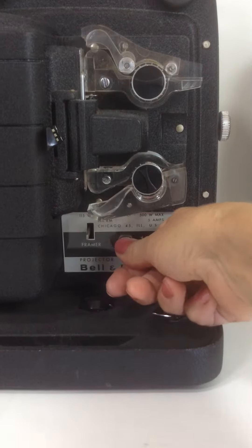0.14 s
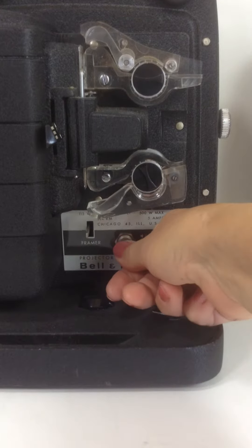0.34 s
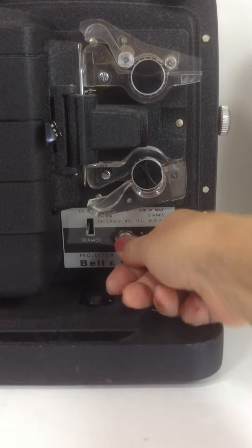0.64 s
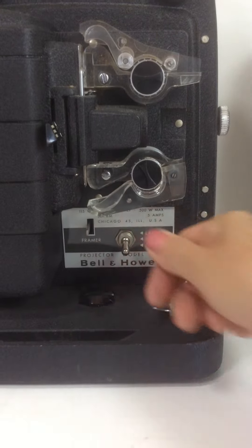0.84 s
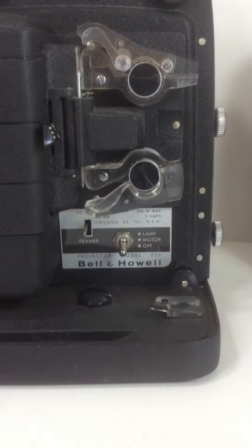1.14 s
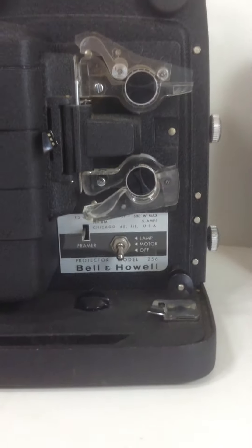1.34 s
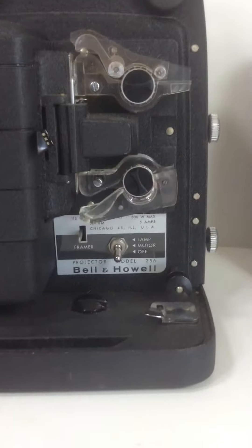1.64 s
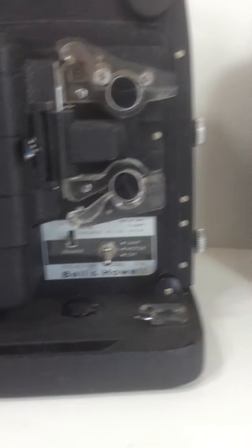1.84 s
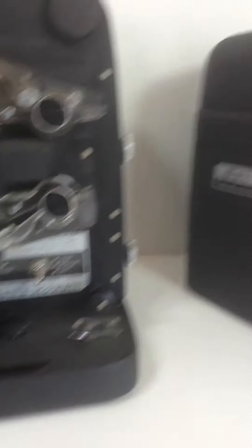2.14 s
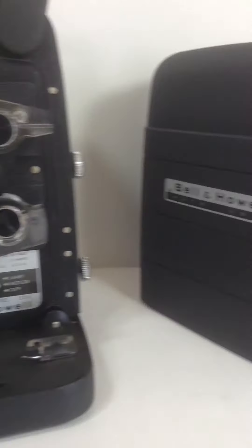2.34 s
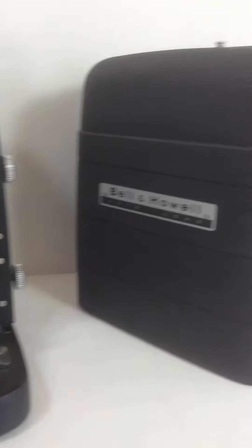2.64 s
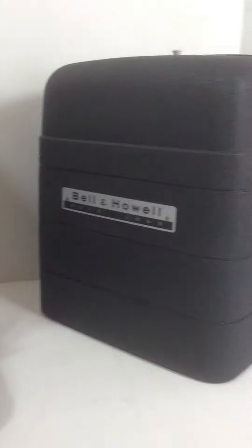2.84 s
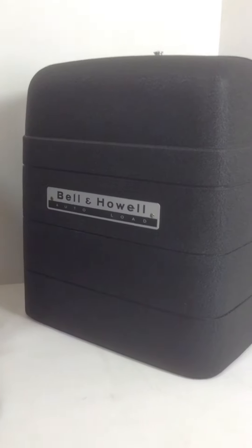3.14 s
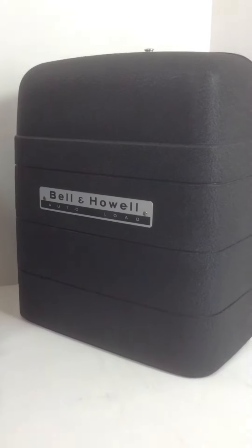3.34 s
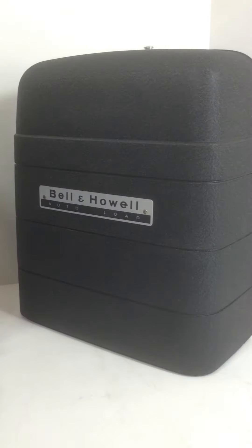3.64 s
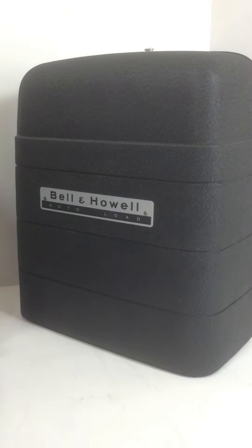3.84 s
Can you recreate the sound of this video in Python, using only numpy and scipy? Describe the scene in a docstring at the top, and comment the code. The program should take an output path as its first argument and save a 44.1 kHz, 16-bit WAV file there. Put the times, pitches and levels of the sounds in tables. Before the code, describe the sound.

Close up in a quiet room, a running projector is switched off with a hard metallic click; its rattling whirr sinks and fades within about a second, followed by soft hiss and sparse camera bumps.

```python
"""Film projector switched off

A film projector's motor hums on a table, made of wavering sine tones, bearing hiss and rattling noise.
A toggle switch snaps off as a train of noise bursts, with a ringing panel and a room tail. The motor
coasts to rest with a fan tone, a whirr and faint squeaks of filtered noise. A loose part chatters, the
hand-held camera is bumped and a tap sweeps down the table, over the shaped noise of a quiet room."""
import sys
import numpy as np
from scipy import signal
from scipy.fft import rfft, irfft
from scipy.io import wavfile
from scipy.ndimage import uniform_filter1d

SR = 44100
rng = np.random.default_rng(int(sys.argv[2]) if len(sys.argv) > 2 else 0)


def dump_mix(stems):
    """Bounce the given channels to the path in sys.argv[1] as a 16-bit WAV at rate SR."""
    frames = np.atleast_2d(stems).T  # one column per channel
    limited = np.clip(frames, -1, 1)  # hard clip at full scale
    pcm = np.round(limited * 32767).astype(np.int16)
    wavfile.write(sys.argv[1], SR, pcm)


def invert_db(x):
    """Field ratio 10**(x/20) for x, a level in decibels (scalar or array-like)."""
    u = np.asarray(x, float) / 20
    return 10 ** u


N = 176400
T = np.arange(N) / SR  # time in seconds

# The room's background noise. Each row: frequency in Hz, level in dB per Hz.
AIR_COLOUR = [(15, -62.5), (25, -31.5), (87, -31.5), (117, -5), (157, -8.5), (185, -2.5), (263, -1.5),
              (373, -5), (451, -4.5), (489, -9.5), (911, -7.5), (2000, -17), (14400, -24.5), (16000, -35)]
AIR_DB = -63.5
BASS_CUT_HZ = 130  # the microphone's roll-off

OFF_S = .2106  # when the power is cut
SHAFT_HZ, COAST_HZ_PER_S = 57.3, 39  # the shaft slows evenly once the power is cut

# Magnetic hum that stops with the current. Each row: multiple of shaft speed, level in dB, flutter in dB.
HUM_TONES = [(4, -54.5, 5), (5, -49, 4), (6, -51, 4.5), (7, -52.5, 4), (8.03, -47.5, 3), (14, -53, 3),
             (15.1, -37.5, 0.5), (16, -46, 2), (27, -52.5, 2), (30.6, -53.5, 2), (35.45, -51.5, 2),
             (59.5, -57.5, 2), (75.5, -57.5, 2.5)]
HUM_T60_S, HUM_WAVER_DB, HUM_JITTER_HZ = 0.069, 1.8, 3

# Hiss of the turning bearing. Each row: centre in Hz, width in Hz, level in dB at full speed.
BEARING_BANDS = [(7500, 2000, -69), (10700, 3100, -66.5)]
BEARING_FLUTTER_DB, BEARING_SPEED_POWER = 3, 0.93

# How hard the running gear shakes the casing. Each row: time in seconds, level in dB.
RATTLE_LEVEL = [(0.0, -39.5), (0.19, -39), (0.48, -47), (0.614, -50), (0.894, -59.5), (1.282, -71),
                (1.6, -70.5)]
# Tone colour of the rattle's broad noise. Each row: frequency in Hz, level in dB per Hz.
RATTLE_COLOUR = [(53, -71.5), (90, -37), (282, -1), (381, -8), (463, -12), (599, -17.5), (883, -6),
                 (963, -7.5), (2050, -19), (2650, -25), (4260, -23.5), (5750, -43.5), (15500, -48.5)]
# Casing resonances. Each row: centre in Hz, width in Hz, level in dB before a shared cut.
CASING_MODES = [(280, 38, -0.5), (356.3, 30, -3), (462, 33, -1.5), (900, 24, -7.5), (1140, 97, -10.5),
                (1390, 60, -11.5), (1670, 50, -13.5), (1780, 53, -12), (2020, 63, -8), (2320, 35, -17),
                (3270, 120, -15.5), (3450, 58, -18), (4162, 99, -17), (4400, 63, -13.5)]
RATTLE_THROB, RATTLE_GRIT_DB = 0.16, -0.5  # pulse share each turn; uneven grit
DULLING_DB = 6  # dB per octave lost per second of coasting

# Contacts of the toggle. Each row: start in seconds, rough peak in dB before colouring.
SNAPS = [(.2086, -26.5), (0.2114, -19.5), (0.21, -7), (0.2106, -2), (0.2095, -5), (0.2125, -7.5),
         (0.2128, -8.5), (0.2146, -8.5), (0.2168, -12), (0.2193, -13.5), (0.2213, -7.5)]
# Tone colour of the snaps. Each row: frequency in Hz, level in dB per Hz.
SNAP_COLOUR = [(35, -51), (60, -24.5), (651, -12), (842, -6), (1140, -11), (1620, -2), (2300, -3.5),
               (4530, -3.5), (6140, -5.5), (9570, -0.5), (14900, -13.5), (16000, -31)]
SNAP_T60_S = .008
# Ringing modes of the front panel. Each row: pitch in Hz, starting level in dB, 60 dB decay in seconds.
PANEL_MODES = [(929, -35.5, 0.33), (1244, -36, 0.34), (1530, -25.5, .15), (1700, -14.5, 0.013),
               (1755, -24, .07), (2860, -34.5, 0.25), (3312, -26, 0.11), (3901, -27.5, 0.08),
               (4320, -30.5, .12), (9533, -34, 0.24), (11000, -23.5, .08)]
PANEL_WAVER_DB = 5
JOLT_DB, JOLT_S = -33, .0005  # peak of the air push; its spread (standard deviation)
# How long the room rings. Each row: frequency in Hz, 60 dB decay in seconds.
ROOM_T60 = [(200, 0.97), (1000, 0.35), (2500, 0.31), (5000, 0.27), (9000, .3), (15000, .25)]
# Tone colour of the room tail. Each row: frequency in Hz, level in dB.
ROOM_COLOUR = [(200, -5.5), (620, -8.5), (1000, -2), (2000, 2.5), (4000, 3.5), (6000, 4), (9000, 1),
               (12000, 3.5), (15000, 3.5)]
ROOM_DB = 11

# The fan blades' tone while coasting. Each row: time in seconds, pitch in Hz, level in dB.
FAN_PATH = [(0.278, 400.4, -59), (0.332, 371.1, -41), (0.399, 337.4, -53), (0.448, 317.7, -54),
            (0.561, 291.9, -44), (0.631, 275.3, -51), (.68, 273, -69), (.8, 288.7, -65),
            (0.928, 290.3, -64), (0.999, 284.5, -78)]
FAN_FLUTTER_DB, FAN_JITTER_HZ = 2.9, 9

# Rough whirr of the slack drive train. Each row: centre in Hz, width in Hz, level in dB before the swell.
WHIRR_BANDS = [(2050, 57, -58), (2870, 60, -63), (3077, 69, -52.5), (4400, 150, -66), (7583, 300, -65.5)]
WHIRR_RISE_S, WHIRR_END_S, WHIRR_FADE_S = .12, .62, .55  # rise and end count from the power cut

# Squeaks while coasting: from the bearing, and near 10 kHz, about every 0.2 s, from a pulley. Each row: middle
# in seconds, level in dB, pitch in Hz, length at half height in seconds.
SQUEAKS = [(0.453, -59, 7500, 0.013), (0.515, -64, 10800, .03), (0.548, -59.5, 7300, 0.017),
           (0.568, -65, 8200, 0.014), (.59, -71, 9900, 0.023), (0.633, -61.5, 7710, 0.017),
           (0.667, -59.5, 7300, 0.016), (0.719, -66, 10700, 0.034), (.765, -62.5, 7170, 0.018),
           (0.802, -63, 7460, 0.024), (0.847, -65.5, 7700, 0.014), (0.886, -68.5, 10750, 0.047),
           (0.932, -65, 7094, 0.018), (0.983, -63, 7120, 0.019), (1.072, -66.5, 10550, 0.044),
           (1.265, -62.5, 7500, 0.011), (1.33, -70.5, 10600, 0.05), (1.374, -67, 12510, .012),
           (1.482, -68, 10200, 0.035)]
SQUEAK_WIDTH_HZ = 2000

# A loose part striking. Each row: start in seconds, level in dB, brightness in dB per octave.
CHATTER_STRIKES = [(0.6902, -48, 6), (0.6927, -39, 6), (0.6947, -44, 1), (0.6976, -43, 5), (.7005, -47, -1),
                   (0.704, -43, -2), (0.709, -44, 2), (0.7195, -45, 4), (.7245, -48, 3), (0.727, -49, 2)]
# Ringing modes of the loose part. Each row: pitch in Hz, level in dB, 60 dB decay in seconds.
CHATTER_MODES = [(1060, -6, .02), (1550, 0, .045), (1890, -5, .015), (2540, 0, .022), (3310, -8, .014),
                 (3750, -7, .012), (4470, -11, .01)]
CHATTER_SPREAD_DB, CHATTER_GRIT_DB = 3, -3  # each strike lands elsewhere and scrapes a little

# Fingers brushing off the switch and the camera. Each row: middle in seconds, level in dB, pitch in Hz,
# length at half height in seconds, width in Hz.
BRUSHES = [(.870, -62, 3540, 0.0082, 1200), (.88, -60, 1203, .015, 910), (2.03, -70.5, 3000, 0.043, 1505),
           (3.223, -64, 2500, 0.013, 3490), (3.599, -65.5, 3807, 0.0083, 701)]

# Knocks on the camera body. Each row: start in seconds, thump peak in dB, tick peak in dB, tick pitch
# in Hz, brightness of the thump in dB per octave.
KNOCKS = [(1.1344, -41.5, -39.5, 4500, 5), (1.1358, -41, -43.5, 1700, 1), (1.1388, -38.5, -40.5, 3970, -2),
          (1.1610, -42.5, -41, 6250, -0.5), (1.1995, -60, -58, 2000, 0), (1.2012, -48.5, -54, 1500, -1.5),
          (1.282, -49, -55, 3000, -2.5), (1.372, -53, -55, 9000, 1), (1.7158, -52.5, -40.5, 2340, 3.5),
          (1.982, -60, -52, 2830, -7), (3.6, -50, -52, 9020, -3)]
# Ringing modes of the camera shell. Each row: pitch in Hz, level in dB, 60 dB decay in seconds.
SHELL_MODES = [(328, -1, .028), (651, 0, .022), (1000, -8, .012), (1303, -6, .018), (1750, -5, .02),
               (2735, -14, .015)]
TICK_T60_S, TICK_WIDTH_SHARE = 0.0103, 0.61  # the tick's width is a share of its pitch

TAP_S, TAP_DB = 1.7176, -38.5
TAP_LOW_HZ, TAP_EXTRA_HZ = 210, 1540  # the pitch starts at their sum and falls towards the low one
TAP_SWEEP_S, TAP_PEAK_S = .0014, .0027


def evened(x):
    """Scales a sound to rms 1."""
    return x / np.sqrt(np.mean(x ** 2) + 1e-20)


def read(points, hz):
    """Reads a frequency table on a log axis."""
    f, value = np.transpose(points)
    return np.interp(np.log(hz + 1), np.log(f + 1), value)


def add(mix, s, sound):
    """Mixes a sound in at s seconds."""
    part = mix[max(round(s * SR), 0):][:len(sound)]
    part += sound[:len(part)]


def coloured(x, points):
    """Shapes a sound's spectrum by a table of levels."""
    gain = invert_db(read(points, np.fft.rfftfreq(len(x), 1 / SR)))
    return irfft(rfft(x) * gain, len(x))


def resonate(x, hz, width_hz):
    """One resonance, with gain 1 at its peak."""
    b, a = signal.iirpeak(min(hz, SR * .45), max(hz / width_hz, .3), SR)
    return signal.lfilter(b, a, x)


def drift(per_s):
    """A slow random wander of rms 1: noise smoothed twice, so a higher per_s moves faster."""
    width = int(SR / per_s)
    smooth = uniform_filter1d(rng.standard_normal(N), width)
    return evened(uniform_filter1d(smooth, width))


def bass_cut(x):
    """The microphone's steep low roll-off."""
    return signal.sosfilt(signal.butter(4, BASS_CUT_HZ, "high", fs=SR, output="sos"), x)


def since_off():
    """Seconds since the power was cut, zero before."""
    return np.maximum(T - OFF_S, 0)


def shaft():
    """Speed of the shaft in turns per second, and the turns made so far."""
    speed = np.maximum(SHAFT_HZ - COAST_HZ_PER_S * since_off(), 0)
    return speed, np.cumsum(speed) / SR


def room_tone():
    """Distant hum and microphone hiss as shaped noise, swelling a little in the bass."""
    hiss = evened(coloured(rng.standard_normal(N), AIR_COLOUR))
    low = signal.sosfilt(signal.butter(2, 600, fs=SR, output="sos"), hiss)
    swell = invert_db(1.2 * drift(4.5)) - 1
    return invert_db(AIR_DB) * (hiss + low * swell)


def magnetic_hum(turns):
    """Tones at multiples of the shaft speed, dying quickly once the current stops."""
    hum = np.zeros(N)
    for multiple, db, flutter_db in HUM_TONES:
        level = invert_db(db + HUM_WAVER_DB * drift(21) + flutter_db * drift(70)) * np.sqrt(2)
        jitter = np.cumsum(HUM_JITTER_HZ * drift(72)) / SR
        hum += level * np.sin(2 * np.pi * (multiple * turns + jitter + rng.random()))
    return hum * invert_db(-60 * since_off() / HUM_T60_S)


def bearing_hiss(speed):
    """Fluttering bands of noise that weaken as the bearing slows."""
    hiss = np.zeros(N)
    for hz, width, db in BEARING_BANDS:
        band = resonate(resonate(rng.standard_normal(N), hz, width), hz, width)
        hiss += invert_db(db + BEARING_FLUTTER_DB * drift(60)) * evened(band)
    return hiss * (speed / SHAFT_HZ) ** BEARING_SPEED_POWER


def casing_rattle(turns):
    """Gritty noise, pulsing with each turn, shakes the casing's resonances and dulls while coasting."""
    throb = 1 + RATTLE_THROB * np.cos(2 * np.pi * turns)
    drive = rng.standard_normal(N) * throb * invert_db(RATTLE_GRIT_DB * drift(250))
    shaken = invert_db(-0.5) * evened(coloured(drive, RATTLE_COLOUR))
    for hz, width, db in CASING_MODES:
        shaken += invert_db(db - 10.5) * evened(resonate(drive, hz, width))
    hz, t, z = signal.stft(shaken, SR, nperseg=512)
    octaves = np.log2(np.maximum(hz, 300) / 300)[:, None]  # above 300 Hz
    z = z * invert_db(-DULLING_DB * np.maximum(t - OFF_S, 0) * octaves)
    dulled = signal.istft(z, SR, nperseg=512)[1][:N]
    level = np.interp(T, *np.transpose(RATTLE_LEVEL))
    level = level - 60 * np.maximum(T - RATTLE_LEVEL[-1][0], 0)  # falls away after the last row
    return invert_db(level) * dulled


def toggle_contacts():
    """A quick train of metal contacts, each a short burst of noise."""
    cracks = np.zeros(N)
    for s, db in SNAPS:
        burst = rng.standard_normal(600) * invert_db(-60 * T[:600] / SNAP_T60_S)
        add(cracks, s, invert_db(db - 20.5) * evened(burst))  # the cut brings the peak to about db
    bright = coloured(cracks, SNAP_COLOUR)
    return bright * np.std(cracks) / np.std(bright)


def panel_ring():
    """The lever's landing rings the front panel: decaying, wavering sine modes."""
    after = since_off()
    ring = np.zeros(N)
    for hz, db, t60 in PANEL_MODES:
        level = invert_db(db - 60 * after / t60 + PANEL_WAVER_DB * drift(40))
        ring += level * np.sin(2 * np.pi * hz * after)
    return bass_cut(ring)


def lever_jolt():
    """The lever's stop pushes the air once: one smooth bump."""
    return invert_db(JOLT_DB) * np.exp(-.5 * ((T - OFF_S - .001) / JOLT_S) ** 2)


def room(x):
    """A dense tail of reflections, each band dying at its own speed."""
    taps = rng.standard_normal(SR) * np.clip((T[:SR] - .0005) / 0.001, 0, 1)
    hz, t, z = signal.stft(taps, SR, nperseg=256)
    fade_db = -60 * t / read(ROOM_T60, hz)[:, None]
    z = z * invert_db(fade_db + read(ROOM_COLOUR, hz)[:, None])
    tail = signal.istft(z, SR, nperseg=256)[1]
    return signal.fftconvolve(x, tail / np.linalg.norm(tail))[:N]


def landing_in_room():
    """The lever's landing fills the room: one coloured click sent through the reflections."""
    click = np.zeros(N)
    add(click, OFF_S, np.ones(1))
    click = coloured(click, SNAP_COLOUR)
    return invert_db(ROOM_DB) * bass_cut(room(click / np.linalg.norm(click)))


def fan():
    """The blades' tone, a jittery sine that fades in after the cut, sinks, then rises a little."""
    s, hz, db = np.transpose(FAN_PATH)
    heard = np.clip(np.minimum(T - OFF_S, s[-1] + .1 - T) / .08, 0, 1)
    level = invert_db(np.interp(T, s, db) + FAN_FLUTTER_DB * drift(30)) * np.sqrt(2)
    pitch = np.interp(T, s, hz) + FAN_JITTER_HZ * drift(90)
    return heard * level * np.sin(2 * np.pi * np.cumsum(pitch) / SR)


def whirr():
    """Narrow bands of noise that swell as the slack drive train coasts, then die away."""
    after = since_off()
    u = after / WHIRR_RISE_S
    swell = u * np.exp(1 - u) * np.clip((WHIRR_END_S - after) / WHIRR_FADE_S, 0, 1)
    bands = np.zeros(N)
    for hz, width, db in WHIRR_BANDS:
        narrow = resonate(rng.standard_normal(N), hz, width)
        bands += invert_db(db) * evened(resonate(narrow, hz, 3 * width))
    return swell * bands


def scuff(s, db, hz, length, width_hz):
    """A squeak or brush: a short grainy rub centred at s, ringing in one broad band."""
    count = int(2 * length * SR)
    grain = rng.standard_normal((count, 2))
    rough = grain[:, 0] * abs(grain[:, 1])
    rub = resonate(resonate(rough, hz, width_hz), hz, 2 * width_hz)
    return s - length, invert_db(db) * evened(rub) * np.hanning(count)


def chatter(s, db, bright_db):
    """One strike of a loose part as the hand lets go, ringing its modes with a little grit."""
    t = T[:2600]
    spread, phase = rng.standard_normal((2, len(CHATTER_MODES)))
    ring = np.zeros(len(t))
    for (hz, mode_db, t60), a, p in zip(CHATTER_MODES, spread, phase):
        tilt_db = bright_db * np.log2(hz / 2000)
        level = invert_db(mode_db + tilt_db + CHATTER_SPREAD_DB * a - 60 * t / t60)
        ring += level * np.sin(2 * np.pi * hz * (1 + 0.015 * a) * t + p)
    scrape = evened(resonate(rng.standard_normal(len(t)), 3000, 2600))
    strike = ring + scrape * invert_db(CHATTER_GRIT_DB - 60 * t / .02)
    return s, invert_db(db) * np.minimum(t / 0.00034, 1) * strike / abs(strike).max()


def knock(s, thump_db, tick_db, tick_hz, bright_db):
    """A knock on the camera: a tick of filtered noise together with the shell's ringing modes."""
    t = T[:2600]
    tick = resonate(rng.standard_normal(len(t)), tick_hz, TICK_WIDTH_SHARE * tick_hz)
    tick = tick * invert_db(-60 * t / TICK_T60_S)
    thump = np.zeros(len(t))
    for hz, db, t60 in SHELL_MODES:
        level = invert_db(db + bright_db * np.log2(hz / 450) - 60 * t / t60)
        thump += level * np.sin(2 * np.pi * hz * t)
    thump = thump * np.minimum(t / 0.00095, 1)  # soft start
    return s, invert_db(thump_db) * thump / abs(thump).max() + invert_db(tick_db) * tick / abs(tick).max()


def table_tap():
    """A tap travelling along the tabletop: highs arrive first, so it sweeps down."""
    t = T[:900]
    hz = TAP_LOW_HZ + TAP_EXTRA_HZ * np.exp(-t / TAP_SWEEP_S)
    u = t / TAP_PEAK_S
    swell = (u * np.exp(1 - u)) ** 2
    return TAP_S, invert_db(TAP_DB) * swell * np.sin(2 * np.pi * np.cumsum(hz) / SR)


def scene():
    """Adds up the room tone, the machine, its switch and the small hand sounds."""
    speed, turns = shaft()
    motor = magnetic_hum(turns) + bearing_hiss(speed) + casing_rattle(turns) + fan()
    switch = toggle_contacts() + panel_ring() + lever_jolt() + landing_in_room()
    small = np.zeros(N)
    for s, db, hz, length in SQUEAKS:
        add(small, *scuff(s, db, hz, length, SQUEAK_WIDTH_HZ))
    for row in CHATTER_STRIKES:
        add(small, *chatter(*row))
    for row in BRUSHES:
        add(small, *scuff(*row))
    for row in KNOCKS:
        add(small, *knock(*row))
    add(small, *table_tap())
    mix = room_tone() + bass_cut(motor + whirr() + small) + switch
    return mix[None]  # one channel


def roll_off(x):
    """The treble ends steeply here."""
    return signal.sosfilt(signal.butter(12, 16550, fs=SR, output="sos"), x)


def record(dry):
    """Returns the finished mix as the camera keeps it."""
    return roll_off(dry)


dry = scene()
out = record(dry)
dump_mix(out)
```